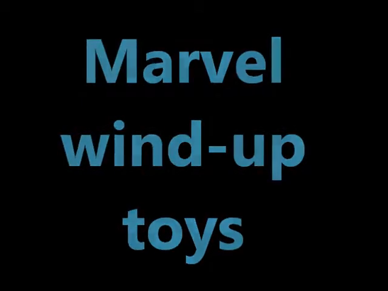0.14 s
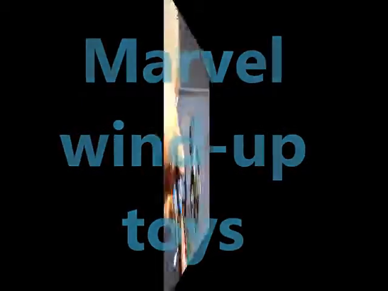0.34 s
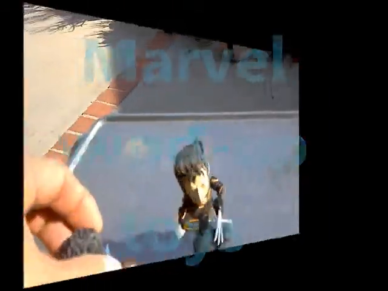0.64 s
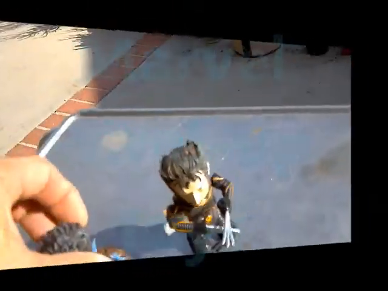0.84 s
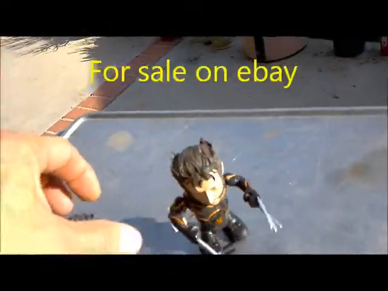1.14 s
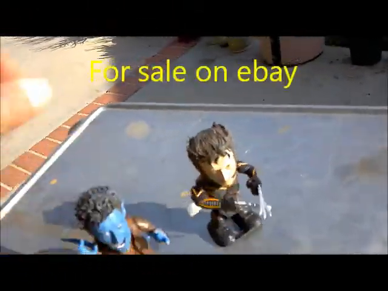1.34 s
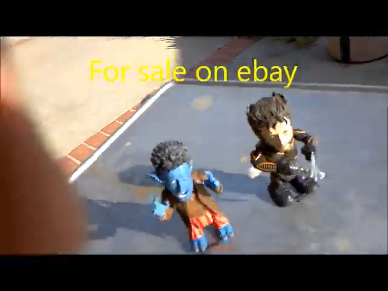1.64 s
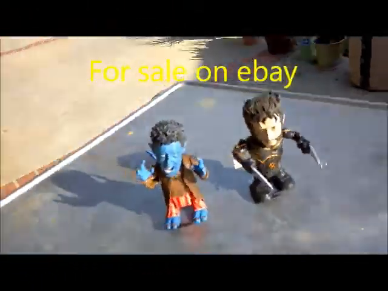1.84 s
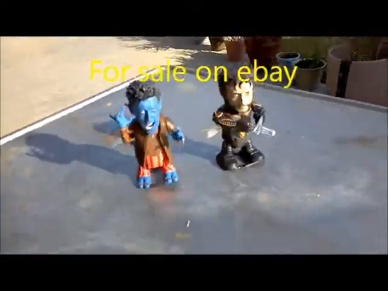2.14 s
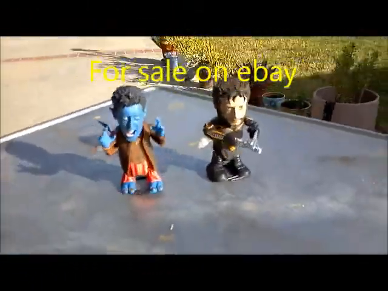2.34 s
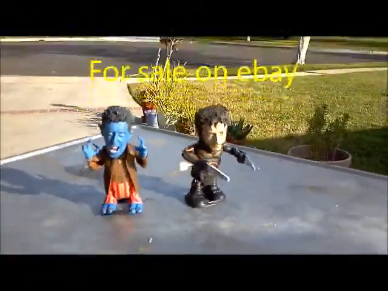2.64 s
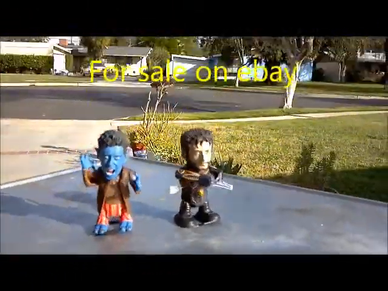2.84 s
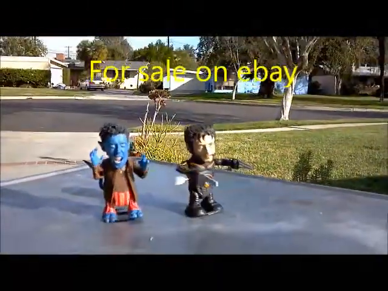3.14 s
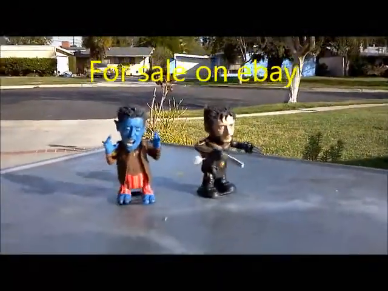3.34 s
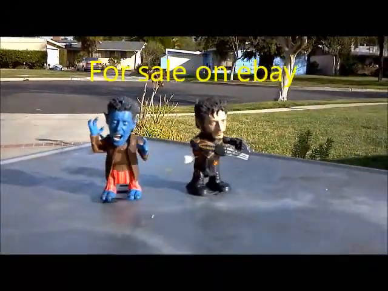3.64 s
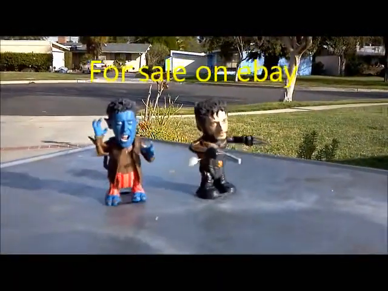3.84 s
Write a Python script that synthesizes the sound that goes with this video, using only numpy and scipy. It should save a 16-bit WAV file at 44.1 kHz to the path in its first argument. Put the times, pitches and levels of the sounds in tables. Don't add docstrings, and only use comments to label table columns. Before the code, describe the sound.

Clockwork whirring from small plastic toys rises out of silence and runs on, bright and uneven, over a faint table hum and quiet street air; a loud thump on the microphone body starts scattered bumps.

```python
import sys
import numpy as np
from scipy import signal
from scipy.fft import rfft, irfft, next_fast_len
from scipy.io import wavfile
from scipy.ndimage import uniform_filter1d, map_coordinates

SR = 44100
rng = np.random.default_rng(int(sys.argv[2]) if len(sys.argv) > 2 else 0)


def volts_from_decibels(level):
    exponent = np.asarray(level, float) / 20
    return 10 ** exponent


def bounce(signal):
    frames = np.transpose(np.atleast_2d(signal))
    limited = np.clip(frames, -1, 1)
    pcm = np.round(limited * 32767).astype(np.int16)
    wavfile.write(sys.argv[1], SR, pcm)


N = 176400


def unit(x):
    return x / np.sqrt(np.mean(x ** 2) + 1e-20)


def along(points, hz):
    f, v = np.transpose(points)
    return np.interp(np.log(hz + 1), np.log(f + 1), v)


def wobble(rate):
    knots = rng.standard_normal(int(N * rate / SR) + 4)
    return map_coordinates(knots, [np.arange(N) * rate / SR])


def filtered(x, response):
    size = next_fast_len(N + SR // 2)
    spectrum = rfft(x, size) * response(np.fft.rfftfreq(size, 1 / SR))
    return irfft(spectrum, size)[..., :N]


def ring(f, hz, width):
    return 1j * f * width / (hz * hz - f * f + 1j * f * width)


def street():
    # (frequency [Hz], level [dB])
    air = [(25, -9), (60, -3), (130, 1.1), (300, 0.5), (800, -8), (2000, -14), (4000, -13.5), (8000, -37)]
    breath = volts_from_decibels(-42 + 0.9 * wobble(7))
    noise = rng.standard_normal((2, N))
    return breath * unit(filtered(noise, lambda f: volts_from_decibels(along(air, f))))


def scrapes():
    # (time of peak [s], frequency [Hz], half-length [s], level [dB])
    strokes = [(0.903, 880, 0.064, -53), (1.102, 750, 0.077, -49), (1.2, 873, .12, -54),
               (1.24, 989, 0.08, -46), (1.3, 855, .08, -45.5), (1.47, 743, 0.064, -45.5),
               (2.08, 898.4, 0.097, -53), (2.146, 604, 0.39, -56), (2.553, 588, 0.23, -52.5),
               (2.9, 870, .1, -52), (3.049, 730, .1, -55), (3.049, 588, .4, -53), (3.252, 1260, .15, -53),
               (3.349, 898.4, .12, -51.5), (3.419, 560.3, 0.13, -52), (3.5, 838, .1, -52),
               (3.644, 650, 0.098, -47), (3.7, 850, .12, -52), (3.799, 408.7, .06, -47),
               (3.9, 690, 0.095, -58), (2.031, 1960, 0.062, -44.5), (2.078, 2283, 0.047, -48)]
    width_hz = 20
    out = np.zeros((2, N + SR))
    for peak_s, hz, length_s, db in strokes:
        t = np.arange(round(2 * length_s * SR)) / SR
        b, a = signal.iirpeak(hz, hz / width_hz, fs=SR)
        hum = unit(signal.lfilter(b, a, rng.standard_normal((2, len(t)))))
        swell = np.sin(np.pi * t / (2 * length_s)) ** 2
        start = round((peak_s - length_s) * SR)
        out[:, start:start + len(t)] += volts_from_decibels(db) * hum * swell
    return out[:, :N]


def table():
    # (frequency [Hz], width [Hz], level [dB])
    modes = [
        (259.3, 21, -51.5),
        (290.2, 22.3, -49),
        (603, 15, -59),
        (867, 47, -61.5),
        (1421, 11.8, -60),
        (2030, 79, -61.5),
    ]
    # (time [s], level [dB])
    feet_points = [(0.55, -47), (0.64, -47), (0.722, -48), (1.03, -45.5), (1.47, -45), (1.711, -46.5),
                   (2.3, -44), (2.82, -45), (3.06, -43.5), (3.73, -43), (4.0, -41.5)]
    # (time [s], level [dB])
    drone_points = [(0.451, -54), (0.5, -44.5), (0.66, -46.5), (0.74, -60), (0.779, -46.5), (1.12, -46.5),
                    (1.299, -51.5), (1.42, -61), (1.51, -51), (1.7, -55.5), (2.0, -54), (2.55, -51),
                    (2.82, -60.5), (3.05, -47), (3.2, -58), (3.799, -48), (3.86, -56), (4.0, -67)]
    t = np.arange(N) / SR

    def drive(points):
        s, db = np.transpose(points)
        return volts_from_decibels(np.interp(t, s, db - db.mean()))

    hums = []
    for hz, width, db in modes:
        noise = rng.standard_normal((2, N))
        hum = unit(filtered(noise, lambda f: ring(f, hz, width) ** 2))
        hums.append(volts_from_decibels(db + 2.2 * wobble(5.98)) * hum)
    drone = hums[0] + hums[1]
    driven = sum(hums[2:]) + street()
    return drive(drone_points) * drone + drive(feet_points) * driven + scrapes()


def knocks():
    # (time [s], level [dB], thud [Hz], contact [s], crack over thud [dB])
    contacts = [(1.6204, -7, 128, .013, -42), (1.6214, -16, 1327, 0.0014, 1.5),
                (1.6305, -12, 330, .0025, -5), (1.719, -26, 141, 0.0063, -7.5), (1.79, -39, 151, .003, -10),
                (1.901, -25.5, 111, 0.012, -2), (1.943, -33, 113, 0.0071, 1.5),
                (2.131, -23.5, 756, 0.00053, -12), (2.247, -23.5, 158, 0.0041, -6),
                (2.385, -33, 250.5, .004, -3), (2.466, -33, 230.6, 0.0019, -17),
                (2.572, -30, 228, 0.0024, -5), (2.594, -19.5, 194, 0.0037, -8),
                (2.098, -36, 130, .004, -12), (.77, -34, 151, 0.0092, 0), (1.075, -40.5, 400, 0.0014, 0),
                (3.81, -30.5, 408.4, 0.00305, -1), (1.641, -31, 130, .006, 1)]
    release_s, crack_s, crack_hz = 0.0029, 0.0048, 1050.2
    t = np.arange(2000) / SR
    near = np.zeros(N + len(t))
    b, a = signal.butter(1, crack_hz, fs=SR)
    for s, db, hz, hold_s, crack_db in contacts:
        pressed = 0.51 + 0.89 * t / hold_s
        released = np.exp(-(t - hold_s) / min(hold_s, release_s))
        thud = np.where(t < hold_s, pressed, released) * np.sin(2 * np.pi * hz * t)
        crack = unit(signal.lfilter(b, a, rng.standard_normal(len(t)))) * np.exp(-t / crack_s)
        start = round(s * SR)
        near[start:start + len(t)] += volts_from_decibels(db) * (thud + volts_from_decibels(crack_db) * crack)
    return np.array([near[:N], np.zeros(N)])


def gears():
    # (time [s], tick rate [1/s], level [dB])
    motor = [(0.42, 142, -25.5), (0.63, 122, -28), (0.719, 166, -27.5), (1.18, 135, -28),
             (1.381, 133, -26.5), (1.91, 131, -31.5), (2.05, 117, -28), (2.141, 148, -30.5),
             (2.29, 142, -27), (2.37, 144, -30), (2.46, 158, -25.5), (2.671, 148, -32), (2.94, 148, -27.5),
             (3.11, 142, -30.5), (3.3, 145, -27.5), (3.38, 135, -28.5), (3.879, 152, -27.5),
             (4.0, 134, -27.5)]
    # (time [s], level [dB])
    crisp_points = [(.36, 2.5), (.42, 0.5), (.6, -0.8), (1.2, -0.5), (1.5, -0.4), (1.9, 1), (2.15, -1),
                    (2.32, 3), (2.45, -2), (2.6, 3), (2.85, 2.7), (3.02, 3), (3.3, 2), (3.55, 1.5),
                    (4.0, -0.5)]
    half_tick_db, scatter_db, jitter_s = -8.5, 1, 0.00015
    rise_s, t60_s = 0.001, 0.0075
    snap_db, snap_t60_s, snap_delay_s = 3, 0.001, 0.00083
    dull_hz = 3480
    tick_db, rattle_db = 2, 1
    join_s, join_rise_s, start_db = 0.36, 0.12, -7
    s, rate, level_db = np.transpose(motor)
    t = np.arange(N) / SR

    phase = 2 * np.cumsum(np.interp(t, s, rate) * (1 + 0.0195 * wobble(9))) / SR
    at = np.flatnonzero(np.diff(np.floor(phase)))
    size_luck, time_luck = rng.standard_normal((2, len(at)))
    size = volts_from_decibels(scatter_db * size_luck + half_tick_db * (np.arange(len(at)) % 2))
    when = np.clip(at + (time_luck * jitter_s * SR).astype(int), 0, N - 1)
    train = np.bincount(when, size, N)

    u = t[:900]
    beat_shape = (1 - np.exp(-u / rise_s)) * volts_from_decibels(-60 * u / t60_s)
    snap_shape = volts_from_decibels(-60 * abs(u - snap_delay_s) / snap_t60_s)
    beat = unit(signal.fftconvolve(train, beat_shape)[:N])
    snap = unit(signal.fftconvolve(train, snap_shape)[:N])
    crisp = volts_from_decibels(np.interp(t, *np.transpose(crisp_points)))
    bursts = beat + 0.41 * volts_from_decibels(snap_db) * crisp * snap
    bursts = bursts * crisp ** 0.26 * volts_from_decibels(1.6 * wobble(9.1))

    noise = rng.standard_normal((2, N))
    ticks = unit(filtered(bursts * noise, lambda f: 1j * f / (dull_hz + 1j * f)))
    roughness = volts_from_decibels(1.44 * wobble(700) + 2.1 * wobble(30.14))
    rattle = unit(roughness * rng.standard_normal((2, N)))
    missing = np.clip(1 - (t - join_s) / join_rise_s, 0, 1)
    mix = unit(volts_from_decibels(tick_db) * ticks + volts_from_decibels(rattle_db + start_db * missing) * rattle)
    return mix * volts_from_decibels(np.interp(t, s, level_db) + 0.4 * wobble(6))


def patchy(x, depth_db):
    # (time [s], turn [dB])
    facing = [(.5, 0), (.62, -3.5), (0.678, 1.5), (.85, -2.5), (.96, 3.5), (1.06, -1.5), (1.14, -0.5),
              (1.23, -1.5), (1.33, 1), (1.49, -3), (1.7, 0.5), (1.86, 2), (2.2, 0.5), (2.29, 2),
              (2.65, 0.8), (3.14, 0.2), (3.41, 2), (3.6, 0.3)]
    # (frequency [Hz], share of the turn)
    bright_side = [(6000, -0.5), (7500, -0.76), (9600, -1.1), (11000, -0.47), (12500, 1.24), (15000, 0.2)]
    # (time [s], opening [dB])
    opening = [(.45, -3), (.64, 0), (.96, -2), (1.06, 2.5), (1.33, -0.3), (1.5, 3), (1.68, -1), (1.8, 6.5),
               (2.15, 2.5), (2.29, -1.5), (2.46, 1.1), (2.65, 4.5), (2.781, -3.5), (3.14, -1.5),
               (3.38, -0.5), (3.55, -2.5), (3.84, -2.5), (4, -1.5)]
    # (frequency [Hz], share of the opening)
    gearbox = [(2500, 0), (3500, 0.42), (4500, 1.57), (6000, 0), (7500, 0)]
    hz, t, z = signal.stft(x, SR, nperseg=256)
    field = rng.standard_normal(z.shape[1:])
    field = uniform_filter1d(uniform_filter1d(field, 7, 0), 24, 1)
    turn_db = np.outer(along(bright_side, hz), np.interp(t, *np.transpose(facing)))
    turn_db += np.outer(along(gearbox, hz), np.interp(t, *np.transpose(opening)))
    z = z * volts_from_decibels(depth_db * unit(field) + turn_db)
    return signal.istft(z, nperseg=256)[1][:, :N]


def shell(raw):
    hz, width_hz, level_db = 5050, 280, -21
    period_s, facing_s, depth_db = 0.697, 1.155, 7
    t = np.arange(N) / SR
    turn = volts_from_decibels(level_db + depth_db * np.cos(2 * np.pi * (t - facing_s) / period_s))
    near, other = 5.8 * turn * filtered(raw, lambda f: ring(f, hz, width_hz))
    return np.array([near, -1.66 * near + other])


def toys():
    # (frequency [Hz], level [dB])
    plastic = [(1000, -19), (2300, -11.5), (3400, -20), (4200, -8), (6000, -9), (8500, -1), (11800, 1.5),
               (15500, -10.5)]
    raw = gears()
    body = filtered(raw, lambda f: volts_from_decibels(8.5 + along(plastic, f)))
    return raw, patchy(body, 1.2)


def ports(pair):
    # (frequency [Hz], share [0-1], far port's lead [rad])
    likeness = [(120, 0.85, 0.02), (308, 1, 0.0057), (820, 0.44, 0.067), (1410, 0.21, 3.3),
                (2270, 0.54, 2.45), (3060, 0, 3.8), (5000, 0.32, 4.2), (6600, 0.19, 16)]
    # (frequency [Hz], level [dB])
    far_port = [(1000, -3), (3000, 6.5), (4600, -2.5), (6000, -9), (8000, -6.5), (12000, -16), (14500, -9)]
    hz, share, lead = np.transpose(likeness)

    def shares(f):
        alike = np.clip(along(np.c_[hz, share], f), 0, 1)
        return [alike * np.exp(1j * along(np.c_[hz, lead], f)), np.sqrt(1 - alike ** 2)]

    far = filtered(pair, shares).sum(axis=0)
    return filtered(np.array([pair[0], far]), lambda f: [np.ones_like(f), volts_from_decibels(along(far_port, f))])


def scene():
    raw, body = toys()
    return ports(body + table()) + shell(raw) + knocks()


def top_cut(x):
    return signal.sosfilt(signal.butter(12, 16830, fs=SR, output="sos"), x)


def record(dry):
    cross, delay, right_db = 0.85, 16, 2.15
    headroom, low_cut_hz, top_hz = 0.9, 28, 15780
    fade_start_s, fade_s, fade_power = 0.3, 0.3, 0.92
    late = np.pad(dry[::-1], ((0, 0), (delay, 0)))[:, :N]
    wide = (dry - cross * late) * volts_from_decibels([[-right_db], [right_db]])
    wide = wide / (1 + abs(wide / headroom) ** 4) ** (1 / 4)
    limited = filtered(wide, lambda f: (f < top_hz) * (1j * f / (low_cut_hz + 1j * f)))
    fade = np.clip((np.arange(N) / SR - fade_start_s) / fade_s, 0, 1) ** fade_power
    return top_cut(limited * fade)


dry = scene()
out = record(dry)
bounce(out)
```